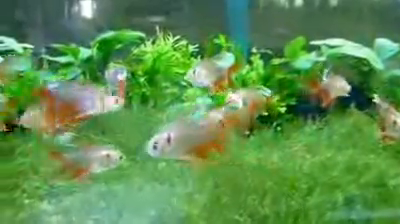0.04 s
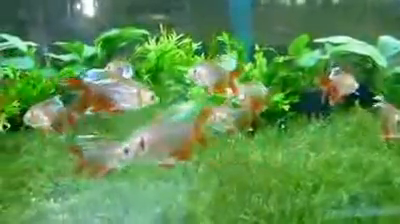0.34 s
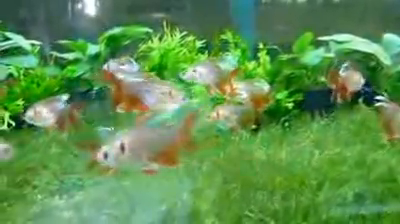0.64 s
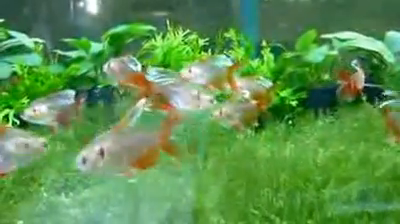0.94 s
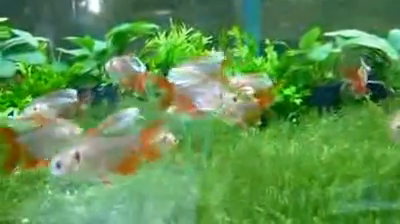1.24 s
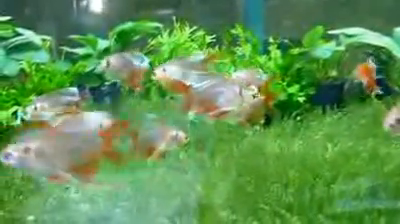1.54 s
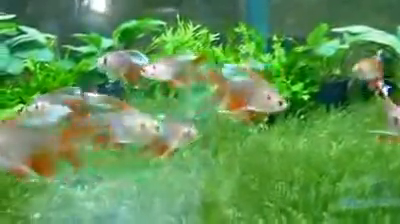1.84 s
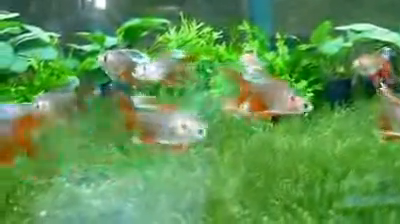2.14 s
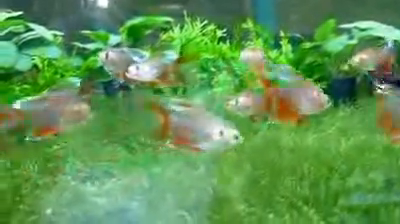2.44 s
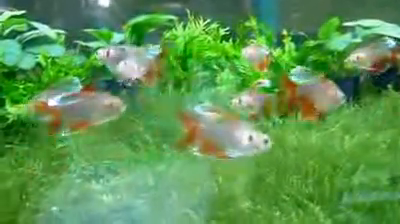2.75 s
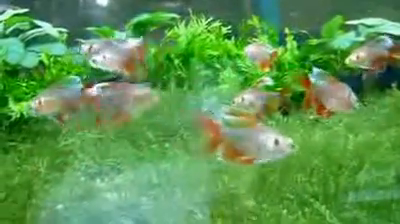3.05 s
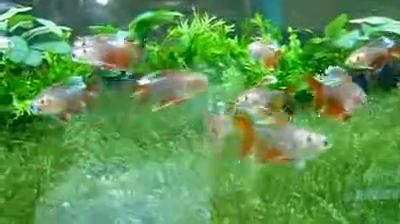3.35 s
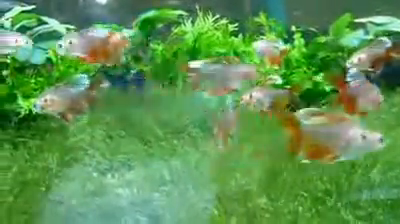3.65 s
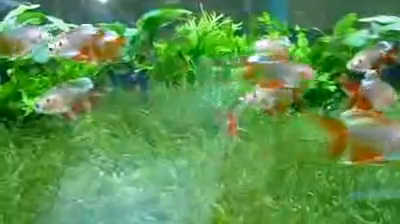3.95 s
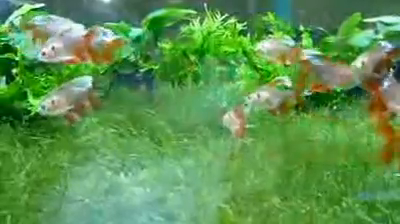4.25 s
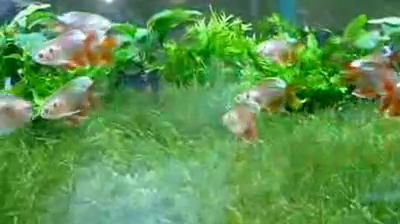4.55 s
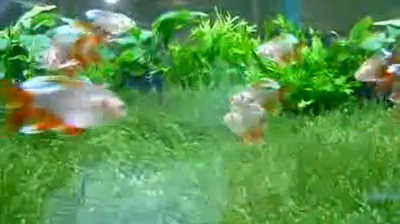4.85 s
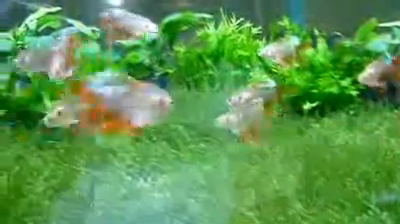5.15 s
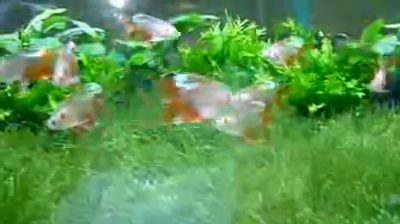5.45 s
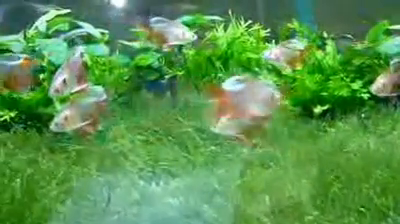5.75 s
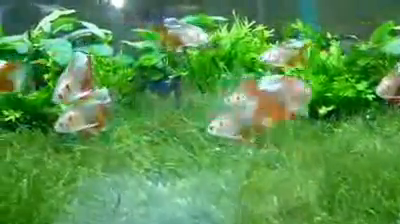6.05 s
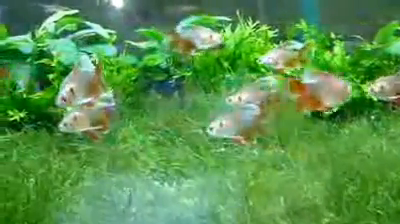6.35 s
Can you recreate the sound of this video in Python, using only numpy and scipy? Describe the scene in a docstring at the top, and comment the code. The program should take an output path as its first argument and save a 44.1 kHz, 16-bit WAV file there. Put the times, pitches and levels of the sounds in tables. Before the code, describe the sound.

An aquarium filter churns and splashes steadily with a wavering hollow whine, small bubble pops and a faint pump hum.

```python
"""In a small room, an aquarium filter runs. Its outflow churns and splashes the water, and the
bubbles keep a hollow of the filter ringing with a wavering whine, louder when a big one gulps free.
Bubbles burst at the surface, foam sizzles and droplets ring the rim. Underneath, the pump hums
on the mains power. Near the end a soft low tone swells and fades."""
import sys
import numpy as np
from scipy import signal
from scipy.fft import rfft, irfft, next_fast_len
from scipy.io import wavfile
from scipy.ndimage import uniform_filter1d, map_coordinates

SR = 44100
rng = np.random.default_rng(int(sys.argv[2]) if len(sys.argv) > 2 else 0)


def bounce(signal):
    """Save signal as a 16-bit WAV file at the path given by the first command-line argument."""
    frames = np.transpose(np.atleast_2d(signal))
    limited = np.clip(frames, -1, 1)
    pcm = np.round(limited * 32767).astype(np.int16)
    wavfile.write(sys.argv[1], SR, pcm)


N = 286637

# How hard the outflow runs. Each row: time in seconds, dB above or below its usual strength.
FLOW_DRIFT = [(0.0, -0.5), (0.25, -1.5), (0.65, 1), (0.88, -2), (1.25, -0.5), (1.5, 0.5), (1.68, 1),
              (1.9, -3), (2.15, -1), (2.3, -0.5), (2.9, -0.3), (3.05, -1.5), (3.5, 1), (3.73, -1),
              (4.15, 0.3), (4.55, -0.5), (4.67, 0.5), (4.85, 1.5), (5.45, -0.5), (5.8, 2), (6.12, -0.8),
              (6.5, -0.5)]
# Big bubbles breaking away. Each row: start in seconds, relative level of the hollow's ring in dB,
# its t60 (the seconds it takes to fade by 60 dB), relative level of the splash in dB.
BIG_BUBBLES = [(0.150, -26, 0.05, -23), (0.184, -23.5, 0.18, -24.5), (0.250, -24, 0.32, -28),
               (0.326, -23.5, 0.13, -26.5), (0.500, -26.5, 0.2, -30), (0.550, -26.5, 0.17, -31),
               (0.630, -33, 0.15, -26), (0.711, -18.5, 0.041, -26.5), (1.119, -25.5, 0.26, -32),
               (1.201, -27, 0.072, -37), (1.261, -22, 0.06, -23), (1.410, -24, 0.2, -30.5),
               (1.520, -25, 0.21, -25), (1.604, -23, 0.14, -25.5), (1.701, -20, 0.1, -41),
               (1.736, -18, 0.11, -29), (1.786, -26, 0.096, -39), (1.955, -23, 0.32, -25.5),
               (2.228, -23.5, 0.4, -23.5), (2.357, -24.5, 0.13, -24.5), (2.563, -20, 0.069, -25),
               (2.724, -27, 0.05, -24), (2.798, -25, 0.06, -28), (2.914, -24.5, 0.2, -27),
               (3.118, -21, 0.12, -30), (3.377, -19.5, 0.045, -37), (3.465, -19, 0.06, -21.5),
               (3.661, -24, 0.093, -25), (3.885, -24.5, 0.33, -27), (3.984, -19, 0.099, -39),
               (4.079, -23.5, 0.16, -31.5), (4.186, -22.5, 0.55, -23), (4.359, -17.5, 0.033, -25),
               (4.482, -22, 0.44, -30), (4.529, -25, 0.092, -27), (4.564, -21.5, 0.099, -30),
               (4.714, -22, 0.054, -31), (4.819, -22, 0.06, -32), (4.860, -19.5, 0.082, -28),
               (4.952, -20, 0.1, -24), (5.113, -17, 0.14, -23.5), (5.359, -19, 0.069, -27),
               (5.709, -21, 0.054, -36), (5.779, -29, 0.06, -26), (5.896, -19, 0.16, -24),
               (5.990, -25.5, 0.25, -36), (6.213, -18, 0.076, -27), (6.314, -24, 0.42, -26.5),
               (6.386, -25.5, 0.062, -30), (6.442, -23.5, 0.095, -29)]


def whine(flow_db):
    """Bubbles keep a hollow of the filter ringing at three close pitches; gulps ring it harder."""
    # The hollow's resonances. Each row: pitch in Hz, half-width in Hz, relative level in dB.
    modes = [(666.8, 16.7, -3), (691, 17, -8), (705.4, 14, -5)]
    mouth_hz, mouth_half_width_hz, mouth_db = 678, 62, 1.5

    def hollow(hz):
        return np.sqrt(sum(amp(db) ** 2 / (1 + ((hz - pitch) / half_width) ** 2) ** 2
                           for pitch, half_width, db in modes))

    drive = bubbles(count=2400, low_hz=543, high_hz=860, cycles=3.26, spread_db=1.5, rise=0.24)
    surges = gulps([(start, db, t60) for start, db, t60, _ in BIG_BUBBLES], rise_s=0.0049)
    # whichever pushes harder, the flow or a gulp, sets the strength of the ring
    strength = np.maximum(amp(-33.5 + 1.3 * flow_db), amp(-1.4) * surges)
    ring = strength * even(filtered(drive, hollow), span_s=0.022)
    # the sound leaves through the hollow's mouth, which keeps it near one pitch
    return filtered(ring, lambda hz: amp(mouth_db) / (1 + ((hz - mouth_hz) / mouth_half_width_hz) ** 2))


def whine_core():
    """Under the gulps, the hollow's lowest resonance sings on, nearly in tune."""
    hz = 667.5 + 7 * wobble(per_second=9)
    return amp(-37 + flow_drift_db()) * sine(hz)


def splash(flow_db):
    """Middle-sized bubbles splash, smaller ones crackle, the tiniest fizz; all swell with the flow."""
    # The tone colour of each of the three. Each row: frequency in Hz, gain in dB.
    splash_colour = [(560, -12.5), (680, 3), (770, 0), (900, -2), (1100, -6.5), (1350, -17.5), (1700, -21),
                     (2500, -36)]
    crackle_colour = [(1000, -3.5), (1400, -2), (1700, 2), (2000, -4), (2800, -7), (3300, -15.5),
                      (4000, -11.5), (5000, -23.5)]
    fizz_colour = [(1940, -3), (3300, -1), (3500, -4), (4970, -4.5), (6500, -8.5), (7620, -13),
                   (8550, -21.5), (8800, -47)]
    gulp_t60 = 0.072  # the splash also jumps with each gulp
    surges = gulps([(start, db, gulp_t60) for start, _, _, db in BIG_BUBBLES], rise_s=0.0037)
    strength = np.hypot(amp(-30 + 0.5 * flow_db), amp(-1.5) * surges)
    middle = bubbles(count=7500, low_hz=608, high_hz=2130, cycles=7.7, spread_db=1.5, rise=0.048)
    middle = tank(room(middle, wet_db=-12.5), splash_colour)
    body = strength * even(middle, span_s=0.13)

    small = bubbles(count=6500, low_hz=1117, high_hz=4840, cycles=15, spread_db=2, rise=0.06)
    small = tank(room(small, wet_db=-8), crackle_colour)
    crackle = amp(-41 + 0.31 * flow_db) * even(small, span_s=0.17)

    tiny = bubbles(count=650, low_hz=5900, high_hz=7700, cycles=80, spread_db=2, rise=0.03)
    ticking_hiss = amp(-12.5) * room(tiny, wet_db=-4) + rng.standard_normal(N)
    fizz = amp(-45 + 0.5 * flow_db) * coloured(ticking_hiss, fizz_colour)
    return body + crackle + fizz


def churn():
    """Large bubbles tumble under the outflow, over the dull rumble of the moving water."""
    # The tone colours of the bubbles and the rumble. Each row: frequency in Hz, gain in dB.
    swarm_colour = [(24, -39.5), (40, -12), (97, -10.5), (145, -11), (192, -7), (322, 3.5), (383, -1),
                    (534, 0), (579, -5.5), (620, -13), (810, -39.5), (1360, -120)]
    rumble_colour = [(14, -27), (30, -13), (40, -6.5), (52, -7.5), (65, -1.5), (80, -9.5), (120, -3.5),
                     (180, -2.5), (300, -10), (1000, -66)]
    large = bubbles(count=4500, low_hz=163, high_hz=810, cycles=4.5, spread_db=1.5, rise=0.12)
    swarm = coloured(room(large, wet_db=-11), swarm_colour)
    rumble = coloured(rng.standard_normal(N), rumble_colour)
    return amp(-32) * swarm + amp(-38) * rumble


def bubbles(count, low_hz, high_hz, cycles, spread_db, rise):
    """A swarm of bubbles at random times: each rings as a sine wave that climbs in pitch as it fades."""
    when, pitch, size = rng.random((count, 3)).T[:, :, None]
    hz = low_hz * (high_hz / low_hz) ** pitch
    samples = np.arange(min(int(cycles * SR / low_hz), 5000000 // count))
    age = np.minimum(samples / SR * hz / cycles, 1)  # 0 at birth, 1 when rung out
    strength = hz * amp(-spread_db * np.log(0.02 + size))  # times hz: equal power per Hz, low to high
    phase = 2 * np.pi * cycles * age * (1 + rise * age / 2)
    rings = strength * amp(-60 * age) * np.sin(phase) * (age < 1)
    positions = (when * N).astype(int) + samples
    return unit(np.bincount(positions.ravel(), rings.ravel(), N)[:N])


def gulps(rows, rise_s):
    """A loudness curve that jumps up and dies away each time a big bubble breaks free."""
    out, t = np.zeros(N), np.arange(SR) / SR
    for start, db, t60 in rows:
        surge = (1 - np.exp(-t / rise_s)) * amp(-60 * t / t60)
        add_at(out, start, amp(db) * surge / surge.max())
    return out


def flow_drift_db():
    """The slow drift in the outflow's strength, in dB for every sample."""
    times, db = np.transpose(FLOW_DRIFT)
    return np.interp(np.arange(N) / SR, times, db)


def droplets():
    """Each droplet lands with a click and rings the rim, most strongly near its own pitch."""
    # Droplets landing. Each row: start in seconds, level in dB, pitch in Hz.
    landings = [(0.111, -34, 3200), (0.159, -31.5, 1350), (0.237, -26.5, 2780), (0.2555, -35.5, 4300),
                (0.355, -33, 3100), (0.534, -31.5, 2600), (0.7126, -24.5, 1800), (0.955, -29.5, 1750),
                (1.1158, -28, 1900), (1.1935, -34.5, 3100), (1.292, -34, 1750), (1.3505, -25.5, 1950),
                (1.556, -26.5, 1850), (1.9377, -25.5, 1760), (2.000, -25.5, 1900), (2.3033, -34, 3600),
                (2.4351, -24.5, 2110), (2.565, -27.5, 1720), (2.615, -27, 1850), (2.791, -35.5, 3800),
                (2.870, -33.5, 3080), (3.181, -25.5, 2350), (3.415, -28, 1750), (3.425, -29, 2300),
                (3.463, -27, 1900), (3.5382, -26.5, 1750), (3.555, -33.5, 3700), (3.6673, -26.5, 1820),
                (3.715, -32, 1750), (3.724, -32, 1750), (4.088, -26.5, 2000), (4.1991, -30.5, 1900),
                (4.6283, -34.5, 3200), (4.824, -27, 1700), (4.95, -24.5, 1980), (5.021, -29.5, 2800),
                (5.094, -32.5, 2660), (5.262, -24.5, 1850), (5.282, -27.5, 1800), (5.446, -38, 2460),
                (5.817, -30.5, 1600)]
    # The rim's resonances. Each row: pitch in Hz, relative level in dB, t60 in seconds.
    rim_modes = [(1505, -2.5, 0.05), (1686, 0.5, 0.055), (1878, 2.5, 0.031), (2390, 1, 0.039),
                 (3060, -3, 0.043), (3296, -0.5, 0.046)]
    reach_octaves = 0.42  # how far from its own pitch a droplet still rings the rim
    click_db, click_t60, attack_s = -11.5, 0.0085, 0.00026
    out, t = np.zeros(N), np.arange(SR // 8) / SR
    mode_hz, mode_db, t60 = np.transpose(rim_modes)
    rings = amp(-60 * t / t60[:, None]) * np.sin(2 * np.pi * mode_hz[:, None] * t)
    attack = 1 - np.exp(-t / attack_s)
    chances_db = rng.standard_normal((len(landings), len(rim_modes)))
    for (start, db, pitch), chance_db in zip(landings, chances_db):
        nearness = np.exp(-(np.log2(mode_hz / pitch) / reach_octaves) ** 2)
        share = amp(mode_db + chance_db) * nearness
        ring = attack * (share @ rings) / np.linalg.norm(share)
        noise = unit(bandpass(rng.standard_normal(len(t)), 1200, 4000))
        click = amp(click_db - 60 * t / click_t60) * noise
        add_at(out, start, amp(db) * (ring + click))
    return out


def pops():
    """A small bubble bursts with a brief ring, which then scatters between the glass walls."""
    # Small bubbles bursting. Each row: start in seconds, relative level in dB, pitch in Hz.
    bursts = [(0.0223, -32, 6700), (0.5524, -33.5, 6160), (0.7138, -30, 7070), (0.7355, -33.5, 5200),
              (0.7474, -34.5, 7100), (0.856, -38, 6680), (1.087, -37.5, 6130), (1.257, -40, 6610),
              (1.3748, -33.5, 6100), (1.4795, -40, 5890), (1.5254, -38, 7600), (1.5818, -37, 6750),
              (1.8145, -36, 7640), (2.2045, -32.5, 5170), (2.2257, -34.5, 6670), (2.2867, -40.5, 7050),
              (2.3471, -36, 6630), (2.427, -35.5, 4700), (2.5306, -41.5, 6590), (2.5655, -34.5, 7660),
              (2.9397, -38, 5270), (2.9582, -30.5, 4050), (3.021, -33, 6170), (3.1112, -34.5, 7630),
              (3.3074, -32, 6240), (3.6611, -38, 5900), (3.8394, -38.5, 6760), (3.960, -37.5, 5200),
              (4.0330, -34, 4620), (4.328, -33.5, 6280), (4.3655, -36, 6600), (4.3974, -37.5, 7360),
              (4.4697, -36.5, 6900), (4.5313, -35.5, 6220), (4.6588, -40.5, 6300), (4.7446, -38, 6350),
              (4.868, -33.5, 6400), (4.9746, -37.5, 6780), (5.0629, -37, 6280), (5.3732, -38.5, 6320),
              (5.475, -37.5, 6250), (5.5175, -32, 6210), (5.5526, -35.5, 6770), (5.8040, -35.5, 6100),
              (5.842, -35.5, 5380), (6.339, -40, 6180), (6.3649, -37.5, 6680), (6.4030, -34, 6270),
              (6.4552, -40.5, 6230)]
    attack_s, ring_t60, scatter_t60, scatter_db = 0.0004, 0.027, 0.065, -2.5
    out, t = np.zeros(N), np.arange(4096) / SR
    attack = 1 - np.exp(-t / attack_s)
    for start, db, hz in bursts:
        ring = amp(-60 * t / ring_t60) * np.sin(2 * np.pi * hz * t)
        noise = around_pitch(rng.standard_normal(len(t)), hz, width_hz=0.21 * hz)
        scatter = amp(scatter_db - 60 * t / scatter_t60) * noise
        add_at(out, start, amp(db) * attack * (ring + scatter))
    return out


def snaps(t60):
    """The film of a larger bubble bursts with a puff of bright noise."""
    # Larger bubbles bursting. Each row: start in seconds, relative level in dB.
    bursts = [(0.714, -20.5), (0.749, -31.5), (1.5542, -28), (2.5664, -27.5), (4.951, -25)]
    out, t = np.zeros(N), np.arange(SR // 10) / SR
    for start, db in bursts:
        add_at(out, start, amp(db - 60 * t / t60) * rng.standard_normal(len(t)))
    return bandpass(out, 1000, 4500)


def foam():
    """A cluster of tiny bubbles gives way in one short, grainy sizzle."""
    # Foam collapsing. Each row: start and length in seconds, level at its loudest in dB, pitch in Hz.
    clusters = [(0.576, 0.048, -48.5, 5900), (2.609, .06, -50, 6070), (2.874, .05, -46, 5430),
                (3.575, .04, -49, 6330), (3.81, 0.055, -48.5, 6500), (4.019, 0.031, -47.5, 5140),
                (4.965, .07, -47.5, 5400), (5.627, .05, -49.5, 6380), (5.70, 0.045, -51, 6300),
                (5.89, 0.042, -48, 6900), (6.056, 0.028, -48, 6650)]
    out = np.zeros(N)
    for start, length, db, hz in clusters:
        size = int(length * SR)
        noise = rng.standard_normal(size)
        grain_db = 4 * unit(uniform_filter1d(rng.standard_normal(size), size=64))
        sizzle = around_pitch(noise * amp(grain_db), hz, width_hz=0.25 * hz)
        swell = np.sin(np.linspace(0, np.pi, size))
        add_at(out, start, amp(db) * swell * sizzle)
    return out


def passing_tone():
    """A soft low tone swells, holds with a flutter and a slight waver, and quickly fades."""
    start_s, rise_s, hold_s, fall_s = 5.17, 0.25, 0.41, 0.04
    corners = start_s + np.cumsum([0, rise_s, hold_s, fall_s])
    swell = np.interp(np.arange(N) / SR, corners, [0, 1, 1, 0])
    hz = 338.5 + 3.5 * wobble(per_second=12)
    level_db = -32.3 + 1.5 * wobble(per_second=28)
    return amp(level_db) * swell * sine(hz)


def pump(mains_hz):
    """The motor shakes its housing at multiples of the mains frequency."""
    # The tones of the hum. Each row: multiple of the mains frequency, level in dB.
    harmonics = [(1, -54), (2, -50.5), (3, -42), (5, -52.5), (7, -51), (8, -50.5), (9, -46), (10, -54),
                 (11, -50), (12, -52.5)]
    t = np.arange(N) / SR
    return sum(amp(db) * np.sqrt(2) * np.sin(2 * np.pi * (multiple * mains_hz * t + rng.random()))
               for multiple, db in harmonics)


def tank(x, colour):
    """Gives x a tone colour and boosts the pitches at which the tank rings."""
    # The tank's resonances. Each row: pitch in Hz, width in Hz, boost in dB.
    modes = [(849, 41, 3), (908, 40, -1.5), (960, 22, 7), (1018, 50, 4.5), (1087, 38, 2), (1233, 60, 7),
             (1344, 37, 3), (1500, 60, 1.5), (1717, 90, 2), (1955, 240, 4.5), (2370, 200, 6),
             (3097, 120, 8), (3200, 91, 0)]

    def boost_db(hz):
        return sum(db / (1 + (2 * (hz - pitch) / width) ** 2) for pitch, width, db in modes)

    return filtered(x, lambda hz: amp(along(colour, hz) + boost_db(hz)))


def room(x, wet_db):
    """Adds the room's echo. The water's surface keeps moving, so each piece of sound takes new paths."""
    # How long the echo lasts. Each row: frequency in Hz, t60 in seconds.
    fade_times = [(200, 0.61), (2000, 0.21), (8000, 0.12)]
    size = 4096
    pieces = np.pad(x, (0, -N % size)).reshape(-1, size)
    hz, t, noise = signal.stft(rng.standard_normal((len(pieces), 2 * size)), SR, nperseg=256)
    fade = amp(-60 * t / along(fade_times, hz)[:, None])
    tails = signal.istft(noise * fade, SR, nperseg=256)[1]
    echoes = signal.fftconvolve(pieces, tails / np.linalg.norm(tails[0]), axes=1)
    positions = size * np.arange(len(pieces))[:, None] + np.arange(echoes.shape[1])
    return x + amp(wet_db) * np.bincount(positions.ravel(), echoes.ravel())[:N]


def amp(db):
    """Turns decibels into a number to multiply by."""
    return 10 ** (np.asarray(db) / 20)


def unit(x):
    """Scales x to an average level (rms) of 1."""
    return x / np.sqrt(np.mean(x ** 2) + 1e-20)


def even(x, span_s):
    """Holds the level of x near 1 over every span_s seconds, so only its fast flutter stays."""
    size = int(span_s * SR) + 1
    power = uniform_filter1d(uniform_filter1d(x * x, size), size)
    return x / np.sqrt(np.abs(power) + 1e-12)


def add_at(out, start_s, sound):
    """Mixes a sound into out, cutting off whatever runs past the end."""
    stretch = out[round(start_s * SR):][:len(sound)]
    stretch += sound[:len(stretch)]


def sine(hz):
    """A sine wave of average level 1 that follows a changing pitch."""
    return np.sqrt(2) * np.sin(2 * np.pi * np.cumsum(hz) / SR)


def wobble(per_second):
    """A smooth curve through evenly spaced random points."""
    points = rng.standard_normal(int(N * per_second / SR) + 4)
    return map_coordinates(points, [np.arange(N) * per_second / SR])


def along(points, hz):
    """Reads between the rows of a (frequency, value) table, on a logarithmic frequency scale."""
    frequencies, values = np.transpose(points)
    return np.interp(np.log(hz + 1), np.log(frequencies + 1), values)


def filtered(x, response):
    """Multiplies each frequency in x by response(hz)."""
    size = next_fast_len(N + SR // 2)
    return irfft(rfft(x, size) * response(np.fft.rfftfreq(size, 1 / SR)), size)[:N]


def coloured(x, colour):
    """Shapes x with a table of gains in dB, then scales it to level 1."""
    return unit(filtered(x, lambda hz: amp(along(colour, hz))))


def around_pitch(x, hz, width_hz):
    """Keeps the part of a short sound near one pitch, scaled to level 1."""
    offset_hz = np.fft.rfftfreq(len(x), 1 / SR) - hz
    return unit(irfft(rfft(x) / (1 + 2j * offset_hz / width_hz) ** 2, len(x)))


def bandpass(x, low_hz, high_hz):
    """Gently turns down what lies below low_hz and above high_hz."""
    return signal.sosfilt(signal.butter(1, [low_hz, high_hz], "band", fs=SR, output="sos"), x)


def scene():
    """The water, its surface and the pump, heard from in front of the glass."""
    flow_db = flow_drift_db() + 0.94 * wobble(per_second=26)  # the outflow surges quickly at random
    surface = amp(-5) * pops() + foam() + droplets() + amp(-5.5) * snaps(t60=0.068)
    water = churn() + splash(flow_db) + whine(flow_db) + whine_core() + room(surface, wet_db=-12.5)
    return (water + pump(mains_hz=50.04) + passing_tone())[None]


def record(dry):
    """Cuts off the highest treble."""
    top_hz = 8750
    return filtered(dry[0], lambda hz: hz < top_hz)[None]


dry = scene()
out = record(dry)
bounce(out)
```